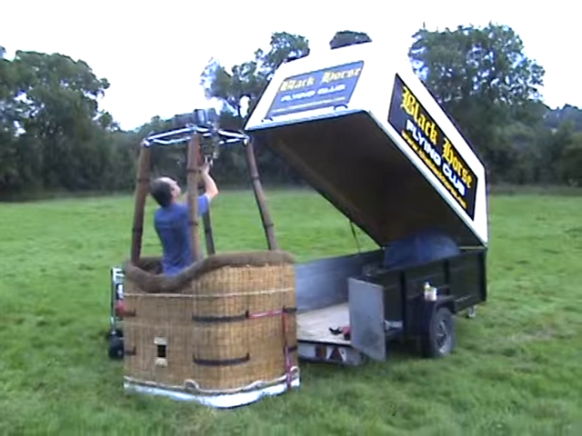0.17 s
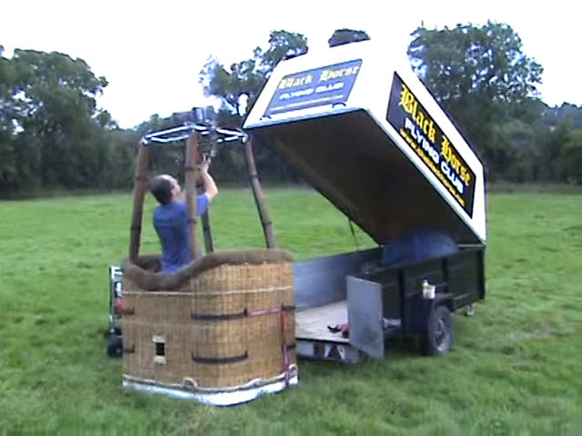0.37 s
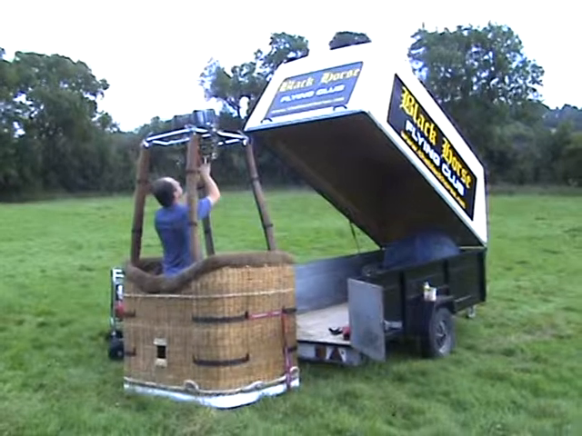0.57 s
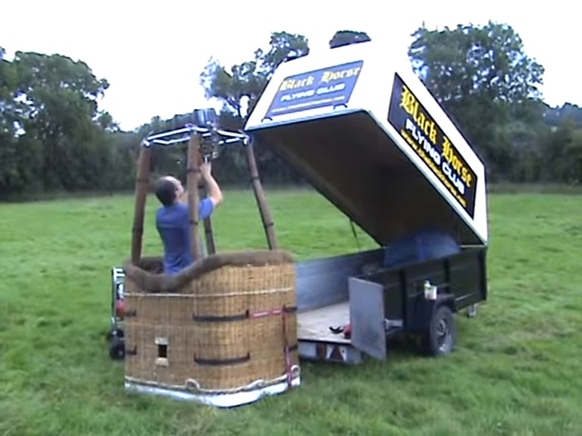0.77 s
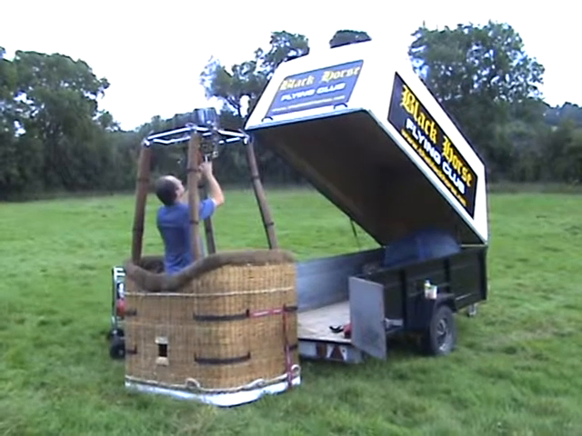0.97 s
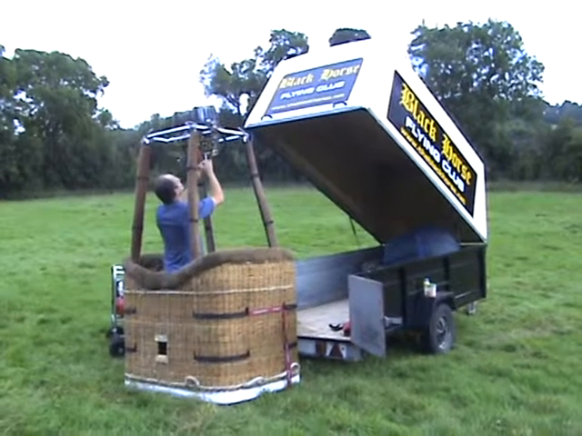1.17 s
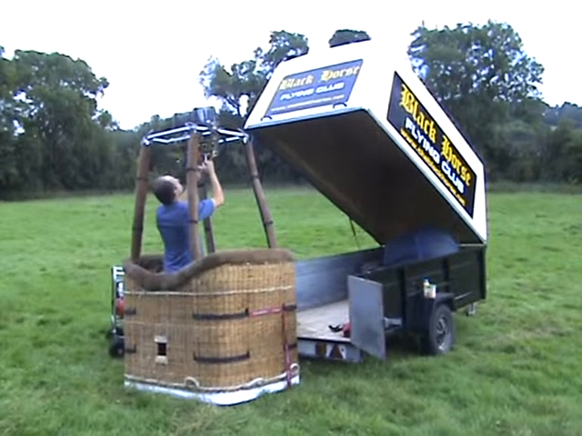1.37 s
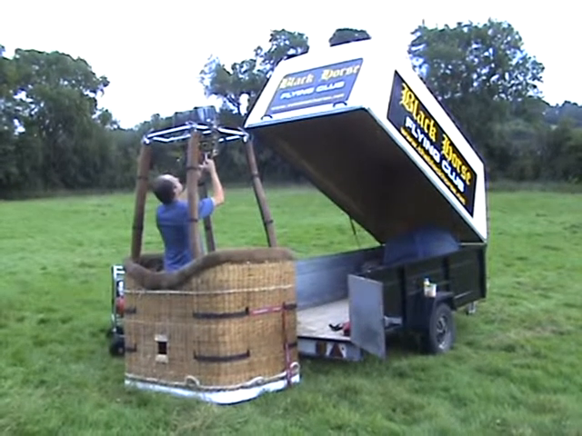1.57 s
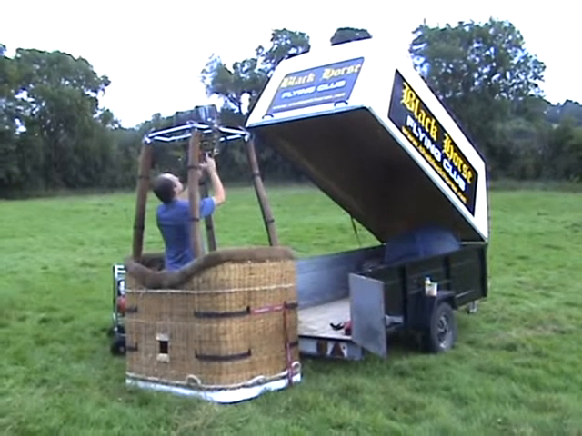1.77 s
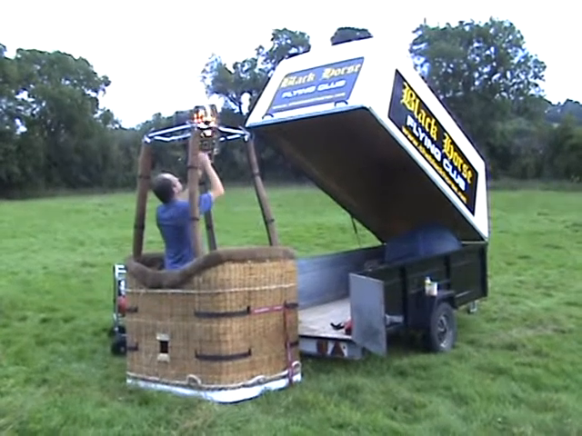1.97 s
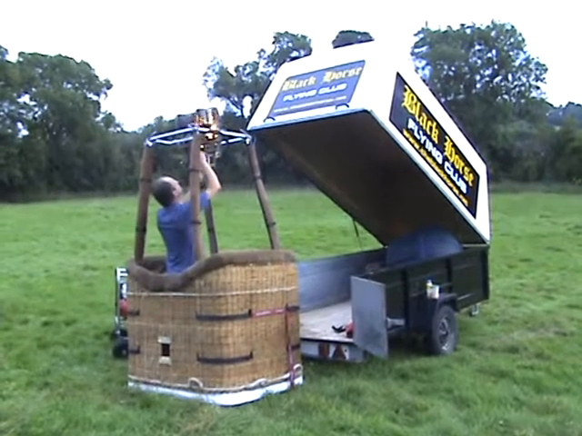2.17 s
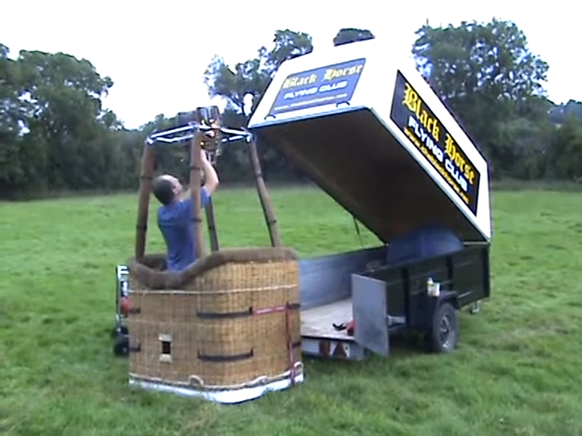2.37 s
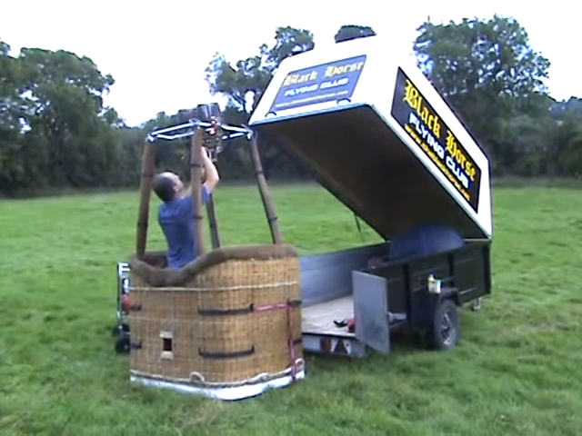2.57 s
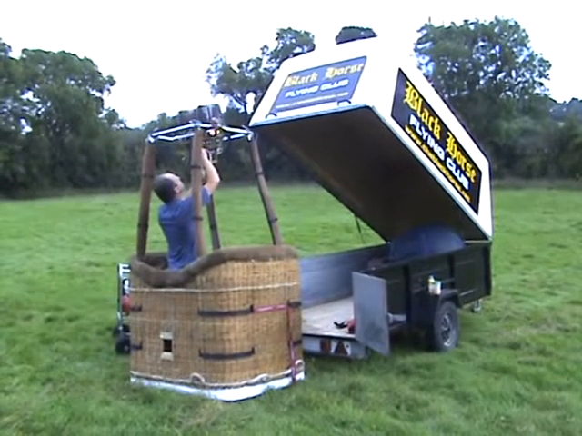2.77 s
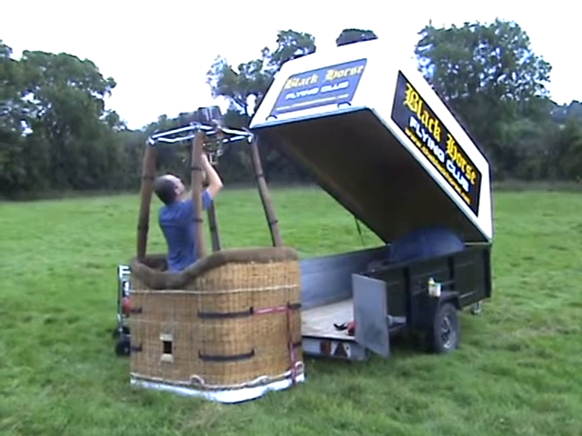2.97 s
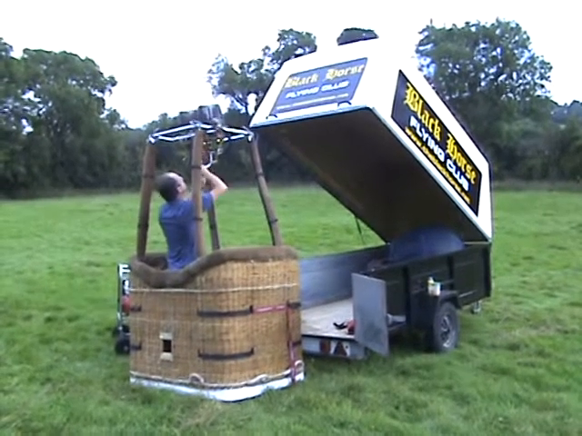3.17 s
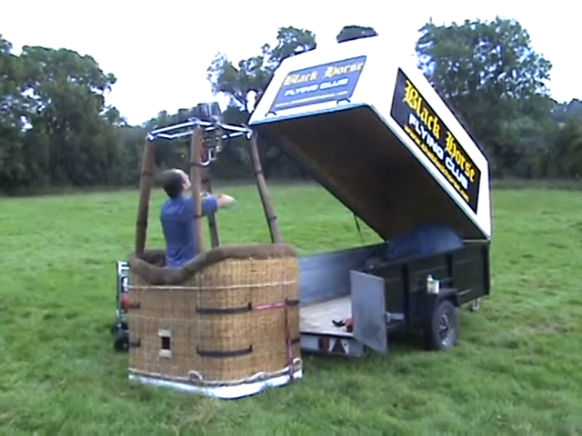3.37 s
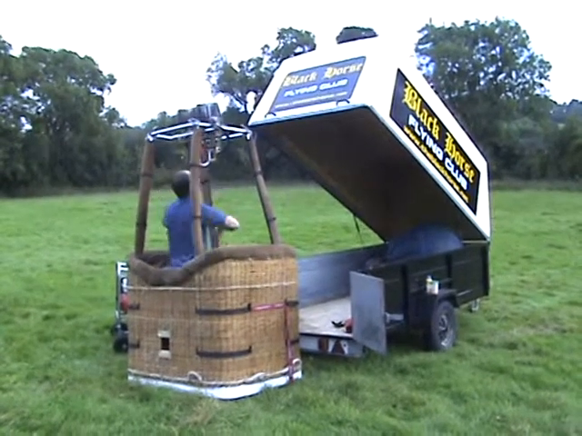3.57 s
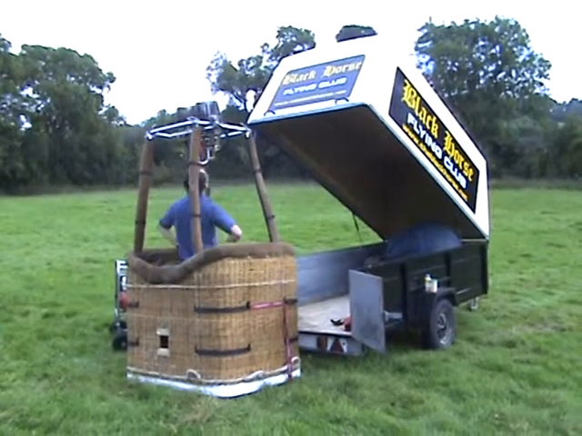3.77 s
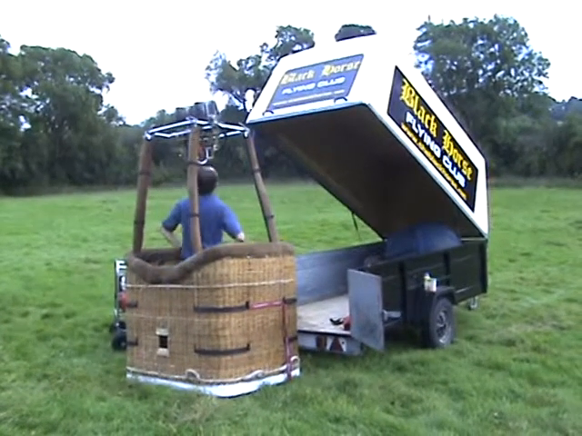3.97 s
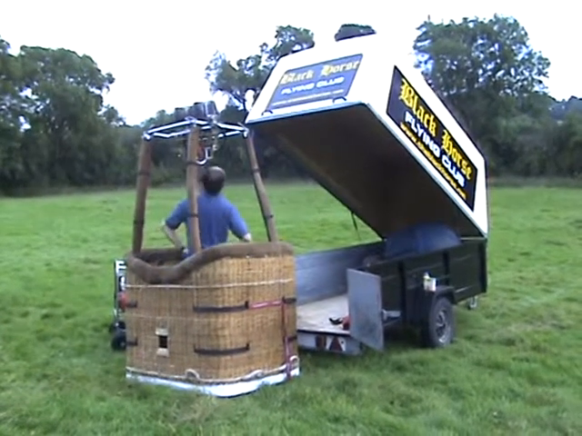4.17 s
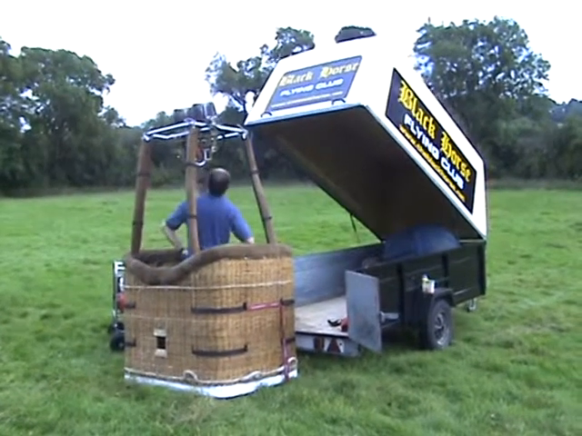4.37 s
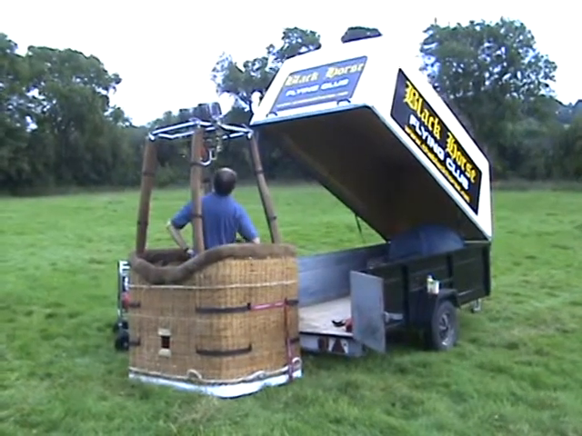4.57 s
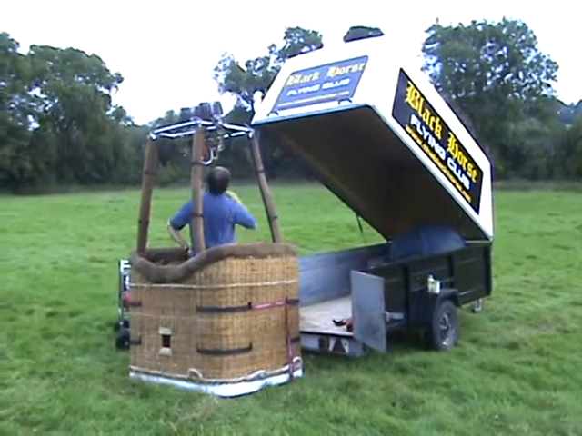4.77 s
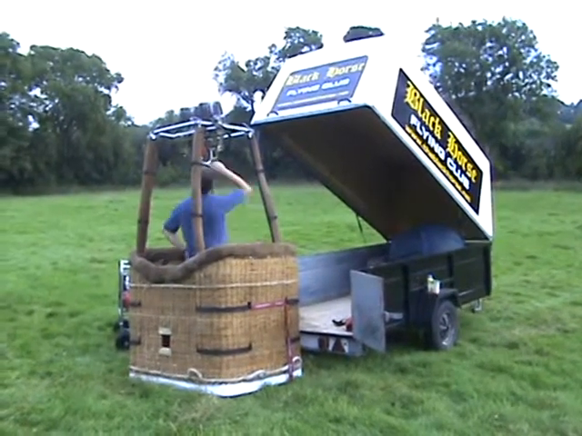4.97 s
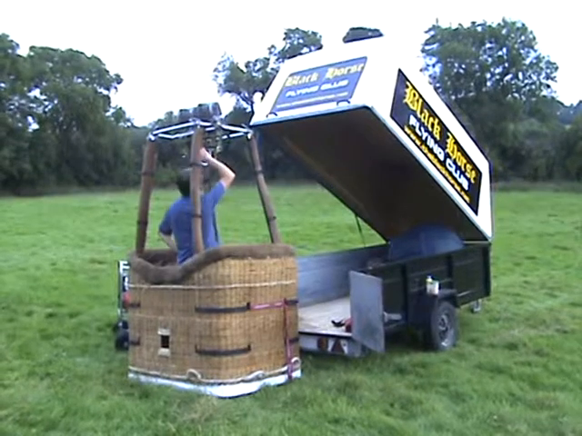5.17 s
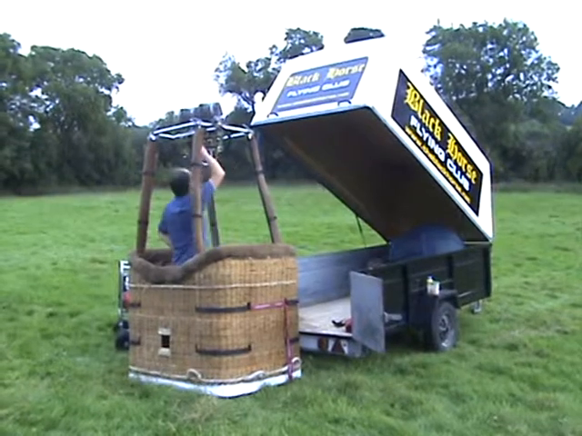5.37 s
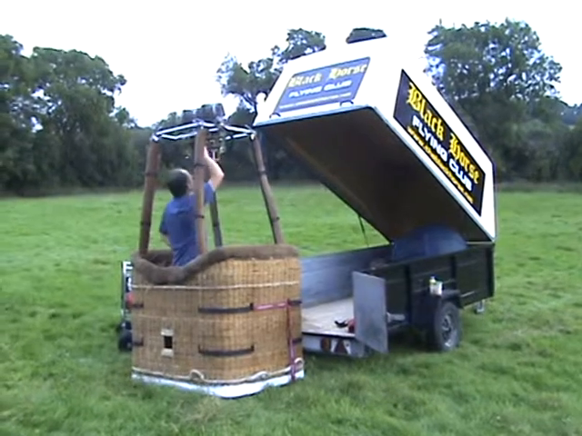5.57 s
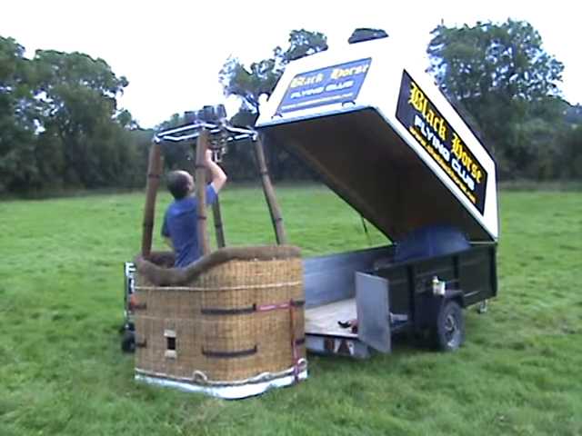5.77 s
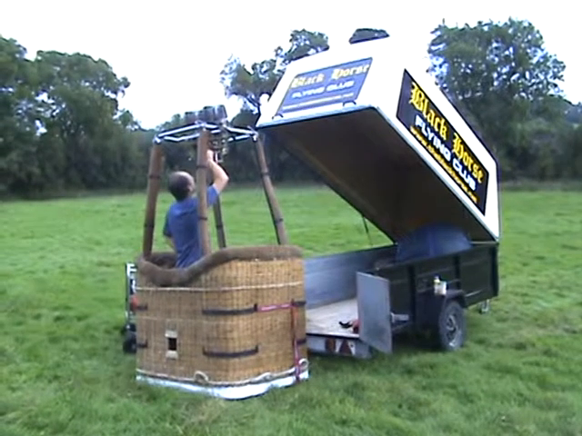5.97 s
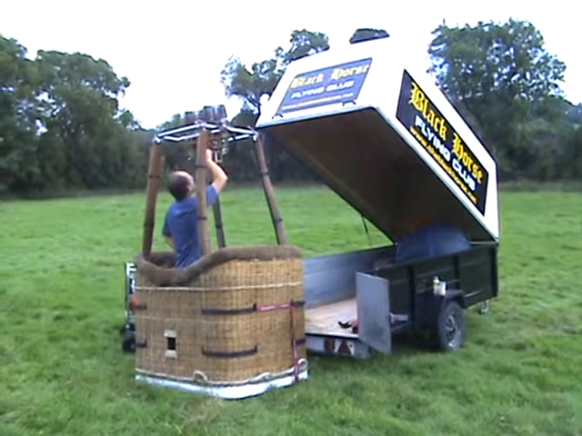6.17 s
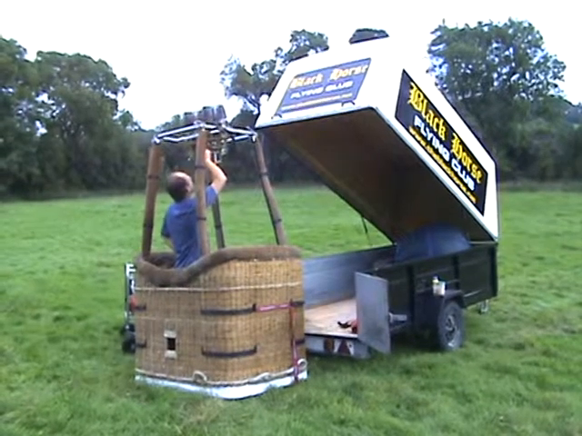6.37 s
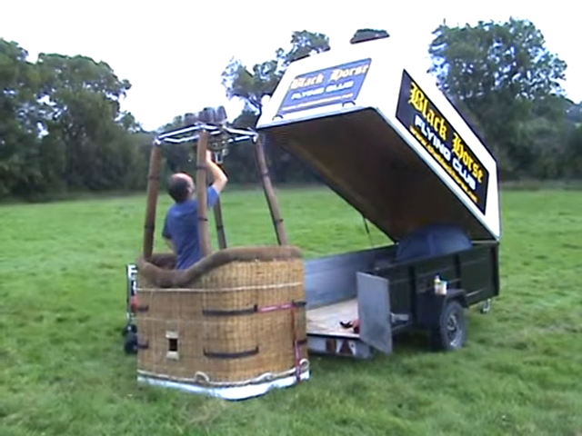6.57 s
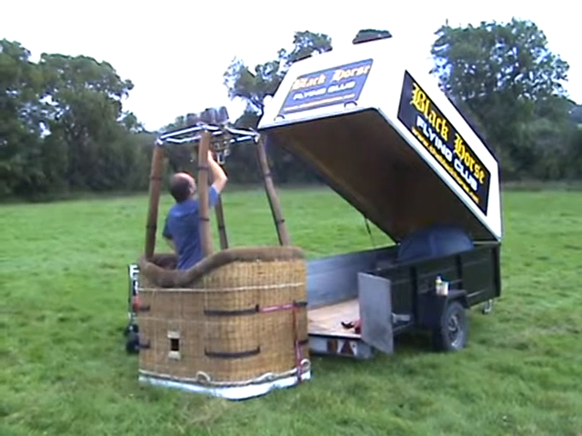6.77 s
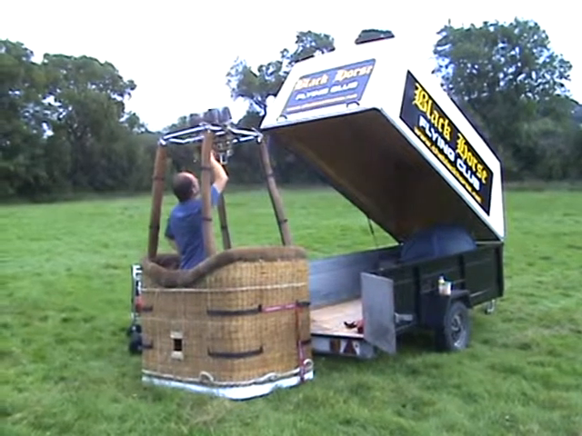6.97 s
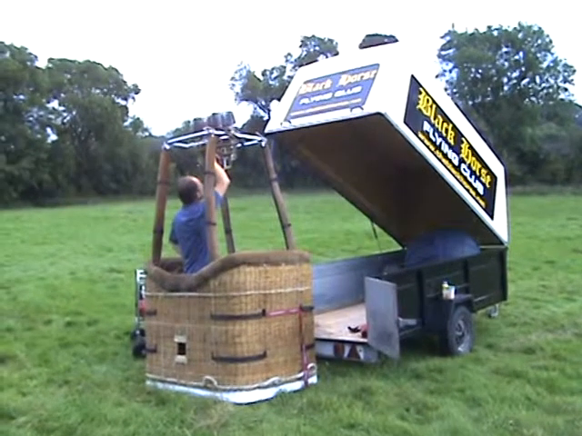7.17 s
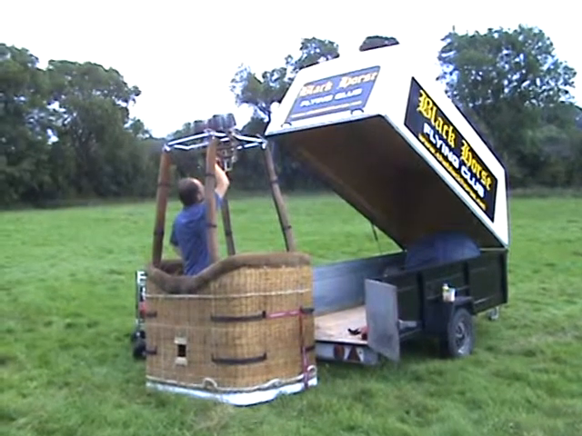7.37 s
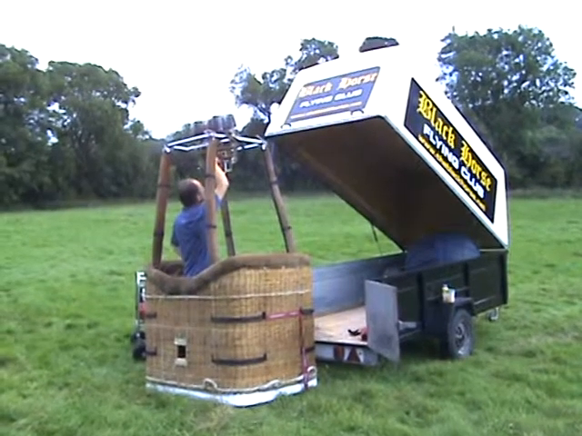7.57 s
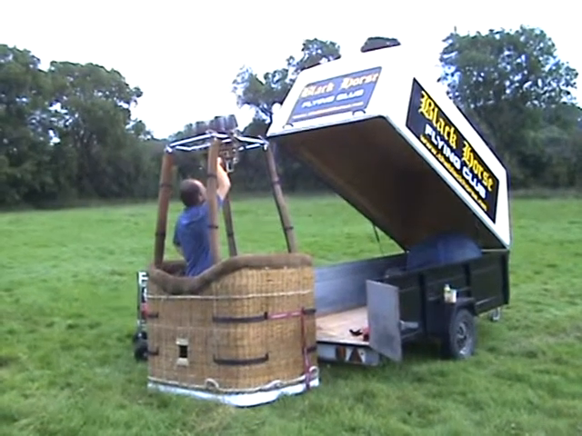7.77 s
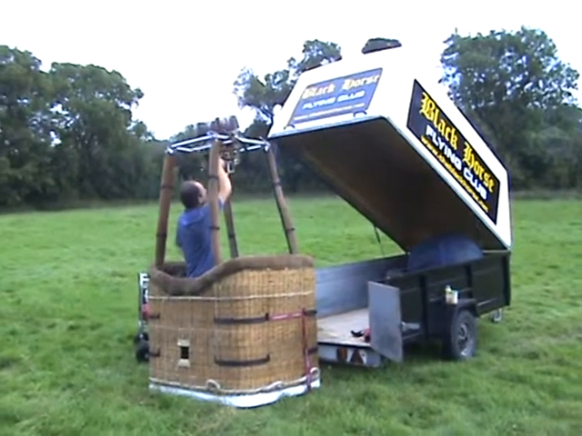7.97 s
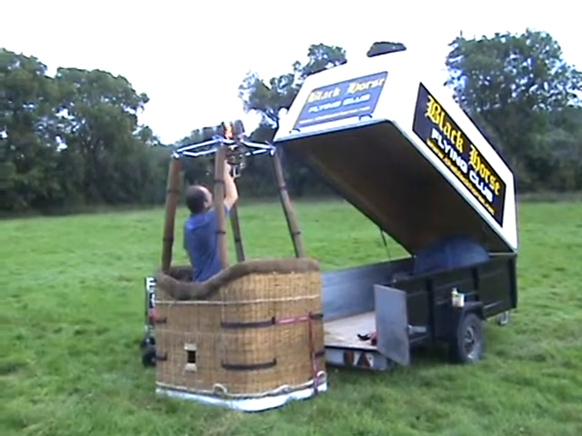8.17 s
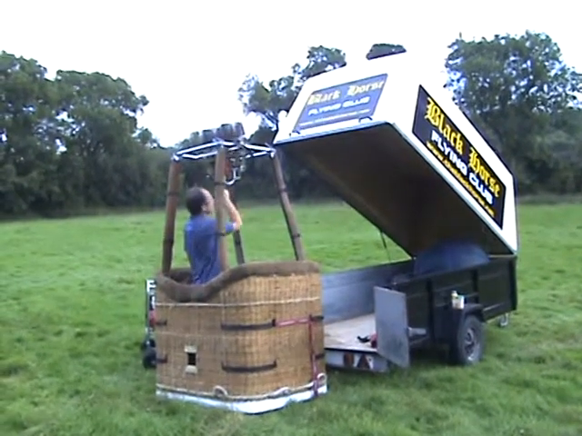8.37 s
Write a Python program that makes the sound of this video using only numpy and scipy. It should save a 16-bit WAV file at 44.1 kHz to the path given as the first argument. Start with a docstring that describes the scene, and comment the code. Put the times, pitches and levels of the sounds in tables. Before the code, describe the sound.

After a sliver of silence, the sound fades in at about 0.05 s on a balloon burner at full blast. A broad, low, turbulent flame roar fills the front, with strong bright gas hiss and slight metallic colouring from the burner can. Very short reflections from ground and trailer thicken it. From 1.4 s the hiss weakens; the roar dulls and collapses between 1.7 and 1.95 s. Then only soft far road wash, low engine rumble and a faint pilot hiss remain, swelling slightly. A tiny double metal tick comes at 3.76 s, a fainter one at 5.6 s, and a lever snap with light rattle at 5.83 s. Gas hisses at 5.96 s, catches with a low thump at 6.04 s, and a second blast roars, somewhat quieter and with much less hiss, fluttering slightly. It dies from 7.9 to 8.1 s, leaving road wash until about 8.4 s.

```python
"""A balloon burner on a wicker basket fires two long blasts over a grass field.
The sound fades in on the first blast: gas hisses from the jets, the flame roars, and ground and
trailer throw both back within milliseconds. The blast dies, and a distant road, there all along,
washes on below a few metal ticks. A hand closes on the valve lever, the gas cloud catches with a
low thump, and the second blast roars and dies. All but the ticks' rings is shaped random noise."""
import sys
import numpy as np
from scipy import signal
from scipy.fft import rfft, irfft
from scipy.io import wavfile
from scipy.ndimage import uniform_filter1d

SR = 44100
rng = np.random.default_rng(int(sys.argv[2]) if len(sys.argv) > 2 else 0)


def to_wav(s):
    """Save 16-bit WAV."""
    ch = np.atleast_2d(s).T  # columns
    pcm = np.round(np.clip(ch, -1, 1) * 32767)  # PCM
    wavfile.write(sys.argv[1], SR, pcm.astype(np.int16))


def nominal_scale(level):
    """Amplitude ratio for a level in decibels (scalar or array-like)."""
    x = np.asarray(level, float) / 20
    return 10 ** x


N = 370881

# flame colour, one spectrum a blast: (frequency [Hz], relative level [dB per Hz])
ROAR_SPECTRA = [
    [(20, -24.5), (65, -6), (130, 2), (250, -0.5), (330, 1), (390, -4.5), (600, -3), (690, -5.5),
     (750, -10), (1100, -13), (2000, -15.5), (3500, -37), (7000, -55.5)],
    [(20, -17.5), (65, -3.5), (130, 1.5), (250, -0.5), (310, -0.5), (390, -6.5), (600, -3), (690, -7),
     (750, -9), (1100, -12.5), (2000, -13.5), (3500, -31), (7000, -45.5)],
]
# jet colour, one spectrum a blast: (frequency [Hz], relative level [dB per Hz])
HISS_SPECTRA = [
    [(1290, -15.5), (2200, -7.5), (2570, -3), (2810, -5), (3470, -10), (4940, -7), (6780, -9.5),
     (8740, -15), (11200, -13), (13900, -20.5), (15500, -24)],
    [(1290, -45), (2200, -13), (2590, -1.5), (3250, -7), (4330, -5.5), (5440, -8), (6300, -7),
     (8880, -15.5), (10800, -15.5), (11800, -15.5), (15500, -26.5)],
]
# ringing coil and can around the jets, one table a blast: (frequency [Hz], width [Hz], usual boost [dB])
CAN_RESONANCES = [
    [(2060, 200, 2), (2580, 140, 4.5), (3800, 200, 1), (4950, 200, 0.5), (6740, 300, 2.5)],
    [(4420, 250, 2), (6200, 250, 2), (8300, 294, 3), (9400, 280, 2.5), (10600, 380, 3.5), (11860, 700, 0.5)],
]
# bounces off ground and trailer, one table a blast:
# (delay [ms], strength at low pitch [ratio], frequency above which it fades [Hz])
NEAR_ECHOES = [
    [(1.6, 0.157, 2480), (2.15, -0.12, 2500), (3.5, 0.45, 1200), (4.3, 0.36, 900), (7.8, 0.006, 703)],
    [(1.7, 0.18, 2020), (2.15, -.15, 2000), (3.5, 0.29, 900), (4.3, 0.31, 900), (7.8, -0.053, 700)],
]
# flame, one row a blast:
# (lights [s], first level [dB], last level [dB], starts to die [s], time until 20 dB down [s])
FLAMES = [(0, -11.8, -12.1, 1.7, .165), (6.044, -17.6, -15.1, 7.875, .115)]
# brief flares and dips of the flame: (time [s], change [dB], width [s])
FLARES = [(6.49, 2, .06), (6.6, -2.5, .045)]
# jet hiss as the valve opens and shuts, one table a blast: (time [s], level before swells [dB])
VALVES = [
    [(0, -24.5), (1.38, -25.5), (1.65, -31.5), (1.736, -37), (1.82, -48), (1.94, -77)],
    [(5.96, -76), (5.99, -48.5), (6.02, -44), (6.045, -33.5), (7.965, -35.5), (8.0, -55), (8.11, -71)],
]
# the hiss swells and sinks about that level: (time [s], change [dB])
SWELLS = [(5.96, 1), (6.02, 3), (6.1, 3), (6.23, 0), (6.53, 3), (6.55, 0), (6.59, 1.5), (6.68, -2.5),
          (7.0, -0.5), (7.24, -2), (7.36, 4.5), (7.44, 3), (7.52, -1.5), (7.7, -0.5), (7.89, 3.5),
          (7.97, 1), (8.05, 2.5)]
# the gas cloud lights: (time [s], level before build-up [dB], top frequency [Hz], time to fall 60 dB [s])
WHOOMP = (6.036, -11, 200, .14)
# small fittings, each at its own pitch:
# (time [s], ring before build-up [dB], ring [Hz], time to fall 60 dB [s], snap before filters [dB])
TICKS = [(3.7578, -22, 4130, 0.012, -32.5), (3.775, -36, 7300, .007, -40), (5.616, -36, 2770, .04, -60)]
# rings of the valve lever: (frequency [Hz], level before build-up [dB], time to fall 60 dB [s])
LEVER_RINGS = [(2510, -40, .05), (5300, -55, .1), (6960, -56, .1)]
# colour of the road: (frequency [Hz], relative level [dB per Hz])
ROAD_SPECTRUM = [(18, -46.5), (30, -16), (48, -6.5), (82, 2.5), (152, -10), (207, -7), (299, -10),
                 (409, -12), (873, -2.5), (1400, -6.5), (2360, -21), (3140, -33), (4410, -41.5),
                 (7840, -56), (15500, -62.5)]
# (time [s], tyre wash level [dB], lower wash against its usual share [dB])
TRAFFIC = [(1.9, -35, -3), (3.1, -34, 0), (3.55, -33, -0.5), (3.75, -32.5, 0), (4.0, -33.5, 1.5),
           (4.4, -32, 1.5), (5.3, -31.5, 1.5), (8.05, -30.5, -2.8), (8.41, -30.5, -1.5)]
# faint hiss bands of the pilot flame: (frequency [Hz], width [Hz], boost [dB])
PILOT_BANDS = [(4337, 330, 4.5), (6250, 280, 6), (7400, 300, 3.5)]
# microphone pair towards the burner:
# (frequency [Hz], left over right [dB], left leads by [radians], likeness [0 to 1])
BURNER_PAIR = [(30, -5.8, .22, .96), (110, -4, .62, .98), (260, -1, 1.15, .995), (400, .4, 1.42, .97),
               (600, 3.1, 1.62, .995), (1400, 6.5, 2.06, .96), (2000, 7, 2.45, .96), (3600, 4.7, 3.64, .93),
               (6500, 1.6, 5.04, .87), (8600, 1.6, 5.48, .8), (12000, .4, 6.09, .93),
               (15000, .2, 6.26, .98)]
# the same pair towards the road, with the same columns
ROAD_PAIR = [(30, -2.3, .04, 1), (110, -2.4, .25, 1), (260, -.8, .77, .99), (600, 3.2, 1.35, .97),
             (1400, 7.3, 2.14, .96), (2000, 6.6, 2.6, .96), (3600, 3, 3.51, .94), (5500, 1.8, 4.44, .76),
             (8600, 0, 5.83, .4), (12000, 0, 6.28, .65), (15000, 0, 6.28, .5)]

# bands in which each noise is scaled to rms 1 before its level is set
ROAR_BAND_HZ, HISS_BAND_HZ, ROAD_BAND_HZ = (100, 1500), (5000, 15000), (400, 2500)
LIGHT_S = 0.018  # a lighting flame rises 20 dB in this time
DYING_TILT = 0.12  # dB per octave lost above 700 Hz for each dB that the flame has sunk
# dB per octave lost above and below about 7 kHz for each dB of weaker flow
WEAK_TOP, WEAK_BOTTOM = 0.3, 0.08
SWELL_TILT = 1  # dB per octave brighter for each dB of swell
LEVER_S, RATTLE_DB, RATTLE_T60_S = 5.833, -54, 0.11  # lever snap, level before its filters
START_S, FADE_S = 0.04342, 0.026  # silence, then fade-in
ROUND_LEVEL = 1.05  # amplitude around which peaks round off


def burner():
    """Both blasts: burning gas roars and the jets hiss; the first burns from the start."""
    out = np.zeros((2, N))
    for flame_row, valve, *colour in zip(FLAMES, VALVES, ROAR_SPECTRA, HISS_SPECTRA, CAN_RESONANCES, NEAR_ECHOES):
        sound = blast(flame_row, valve, *colour)
        length = sound.shape[1]
        start = round(valve[0][0] * SR)
        out[:, start:start + length] = sound * signal.windows.tukey(length, 0.02)
    return out


def blast(flame_row, valve, roar, hiss, can, echoes):
    """One blast: the valve feeds gas through the jets to the flame above them."""
    start_s, end_s = valve[0][0], valve[-1][0]
    t = np.arange(round(start_s * SR), round(end_s * SR)) / SR
    return flame_roar(t, start_s, flame_row, roar, can, echoes) + jet_hiss(t, start_s, valve, hiss, can, echoes)


def flame_roar(t, start_s, flame_row, roar, can, echoes):
    """Rough burning makes low noise; a dying flame loses its upper roar first."""
    lights, first_db, last_db, dies, fall_s = flame_row

    def sunk_db(at):
        """The flame dies ever faster once the gas runs out."""
        return -20 * (np.maximum(at - dies, 0) / fall_s) ** 2

    def fire(hz, frame_s):
        """Spectrum of the flame over time."""
        sunk = np.maximum(sunk_db(start_s + frame_s + 0.066), -25)  # the dulling runs 66 ms ahead
        dull_db = DYING_TILT * sunk * np.log2(np.maximum(hz / 700, 1))
        return near_colour(hz, frame_s, can, echoes) * nominal_scale(read(roar, hz)[:, None] + dull_db)

    flame = rush(fire, ROAR_BAND_HZ, BURNER_PAIR, len(t), size=4096,
                 patchy_db=0.5, flutter_db=0.12, flutter_s=0.023)
    level_db = np.interp(t, [lights, dies], [first_db, last_db])
    level_db += sum(db * np.exp(-((t - at) / width) ** 2) for at, db, width in FLARES)
    level_db += sunk_db(t) - 20 * np.maximum(lights - t, 0) / LIGHT_S
    return flame * nominal_scale(level_db)


def jet_hiss(t, start_s, valve, hiss, can, echoes):
    """Fast gas hisses; a weak flow narrows to the middle of the hiss, swells are brighter."""
    valve_s, valve_db = np.transpose(valve)

    def swell_db(at):
        """Swell of the hiss; none before the first point."""
        return np.interp(at, *np.transpose(SWELLS), left=0)

    def jet(hz, frame_s):
        """Spectrum of the jets over time."""
        at = start_s + frame_s
        weak_db = np.interp(at, valve_s, valve_db) - valve_db.max()
        octaves = np.log2(hz / 7000 + 0.1)  # the 0.1 keeps 0 Hz finite
        tilt = WEAK_TOP * np.maximum(octaves, 0) - WEAK_BOTTOM * np.minimum(octaves, 0)
        bright_db = SWELL_TILT * swell_db(at) * octaves
        level_db = read(hiss, hz)[:, None] + weak_db * tilt + bright_db
        return near_colour(hz, frame_s, can, echoes) * nominal_scale(level_db)

    jets = rush(jet, HISS_BAND_HZ, BURNER_PAIR, len(t), size=1024,
                patchy_db=1.18, flutter_db=0.78, flutter_s=0.014)
    return jets * nominal_scale(np.interp(t, valve_s, valve_db) + swell_db(t))


def near_colour(hz, frame_s, can, echoes):
    """Late copies add and cancel by pitch; can resonances come and go as the flame shifts."""
    comb = 1
    for ms, strength, fade_hz in echoes:
        comb = comb + strength * np.exp(-2j * np.pi * hz * ms / 1000 - (hz / fade_hz) ** 2)
    depth = 1 + 0.53 * chance(frame_s.shape, (0.067 / frame_s[1],))  # smoothed over 67 ms
    return abs(comb) * boosts(can, hz, depth)


def whoomp():
    """A low burst of pressure as the gas cloud catches: noise that builds up and dies."""
    start_s, db, top_hz, t60 = WHOOMP
    t = np.maximum(np.arange(N) / SR - start_s, 0)
    band = signal.butter(2, (40, top_hz), "bandpass", fs=SR, output="sos")
    low = signal.sosfilt(band, rng.standard_normal(N))
    build_up = 1 - np.exp(-(t / 0.006) ** 2)
    return at_microphones(low / low.std() * nominal_scale(db - 60 * t / t60) * build_up)


def ticks():
    """Small fittings tick, and the lever rattles as a hand closes on it."""
    out = np.zeros(N)
    hits = [(s, [(hz, db, t60)], snap_db, 0.7 * t60) for s, db, hz, t60, snap_db in TICKS]
    hits.append((LEVER_S, LEVER_RINGS, RATTLE_DB, RATTLE_T60_S))
    for start_s, *how in hits:
        sound, start = tick(*how), round(start_s * SR)
        out[start:start + len(sound)] += sound
    return at_microphones(out)


def tick(rings, snap_db, snap_t60):
    """Struck metal: a short noisy snap, and rings that swell in two milliseconds and die."""
    t = np.arange(6000) / SR
    band = signal.butter(6, (1300, 8000), "bandpass", fs=SR, output="sos")
    dull_noise = signal.lfilter([1], np.poly([0.9, 0.9]), rng.standard_normal(len(t)))
    snap = nominal_scale(snap_db - 60 * t / snap_t60) * dull_noise * np.minimum(t / 0.0013, 1)
    ringing = sum(nominal_scale(db - 60 * t / t60) * np.sin(2 * np.pi * hz * t) for hz, db, t60 in rings)
    return signal.sosfilt(band, snap) + ringing * (1 - np.exp(-(t / 0.0022) ** 2))


def road():
    """Far tyre wash whose lower part comes and goes, over engine rumble and the pilot flame's hiss."""
    s, wash_db, lower_db = np.transpose(TRAFFIC)

    def shape(hz, frame_s):
        """The usual spectrum, its lower wash drifting around 550 Hz."""
        lower = np.exp(-np.log(hz / 550 + 1e-9) ** 2 / 0.27)
        drift_db = lower * np.interp(frame_s, s, lower_db)
        return boosts(PILOT_BANDS, hz, 1) * nominal_scale(read(ROAD_SPECTRUM, hz)[:, None] + drift_db)

    wash = rush(shape, ROAD_BAND_HZ, ROAD_PAIR, N, size=4096,
                patchy_db=0.44, flutter_db=0.26, flutter_s=0.02)
    return wash * nominal_scale(np.interp(np.arange(N) / SR, s, wash_db))


def rush(shape, band, pair, count, size, patchy_db, flutter_db, flutter_s):
    """Turbulent noise: random short spectra with drifting patches and a quick flutter, rms 1 in its band."""
    hop, hz = size // 4, np.fft.rfftfreq(size, 1 / SR)
    frame_s = np.arange(count // hop + 5) * hop / SR
    a, b, c, d = rng.standard_normal((len(frame_s), len(hz), 4)).T
    shared, right_only = a + 1j * b, c + 1j * d
    left, common, own = ports(pair, hz)[:, :, None]
    z = np.array([left * shared, common * shared + own * right_only])
    # patches about 60 ms long and 500 Hz wide
    patches = chance((len(frame_s), len(hz)), (0.06 * SR / hop, 500 / hz[1])).T
    z *= shape(hz[:, None], frame_s) * nominal_scale(patchy_db * patches)
    x = signal.istft(z, nperseg=size, noverlap=size - hop)[1][:, :count]
    x *= nominal_scale(flutter_db * chance((count,), (flutter_s * SR,)))
    hz, power = signal.welch(x.mean(0), SR, nperseg=2048)
    in_band = (hz > band[0]) & (hz < band[1])
    return x / np.sqrt(power[in_band].sum() * hz[1])


def chance(shape, widths):
    """Random field smoothed along each axis, rms about 1."""
    field = rng.standard_normal(shape)
    for axis, width in enumerate(widths):
        field = uniform_filter1d(field, max(1, round(width)), axis=axis)
    return field / field.std()


def boosts(table, hz, depth):
    """Gain of a few resonances, each strongest at its own pitch."""
    return nominal_scale(depth * sum(db / (1 + (2 * (hz - f) / width) ** 2) for f, width, db in table))


def read(points, hz):
    """The columns of a table over frequency, joined by straight lines on a log axis."""
    f, *columns = np.transpose(points)
    return np.squeeze([np.interp(np.log(hz + 1), np.log(f + 1), column) for column in columns])


def ports(pair, hz):
    """Left factor, right common and right own share, scaled so that the middle keeps power 1."""
    db, lead, common = read(pair, hz)
    left = nominal_scale(db) * np.exp(1j * lead)
    own = np.sqrt(1 - common ** 2)
    return np.array([left, common, own]) * 2 / np.sqrt(abs(left + common) ** 2 + own ** 2)


def at_microphones(x):
    """A single short sound as both microphones hear it from the basket."""
    size = N + N % 2
    left, common, own = ports(BURNER_PAIR, np.fft.rfftfreq(size, 1 / SR))
    right = abs(common + 1j * own)
    return irfft(np.array([left, right]) * rfft(x, size))[:, :N]


def scene():
    """Burner, catching gas, ticks and road together."""
    return burner() + whoomp() + ticks() + road()


def band_limit(x):
    """A steep low-pass at the top of the band."""
    return signal.sosfilt(signal.butter(12, 15620, fs=SR, output="sos"), x)


def record(dry):
    """The sound fades in after a silent start; the loudest peaks round off."""
    rise = np.clip((np.arange(N) / SR - START_S) / FADE_S, 0, 1)
    x = dry * np.sin(np.pi / 2 * rise) ** 2
    x = x / (1 + abs(x / ROUND_LEVEL) ** 3.9) ** (1 / 6.0)
    return band_limit(x)


dry = scene()
out = record(dry)
to_wav(out)
```